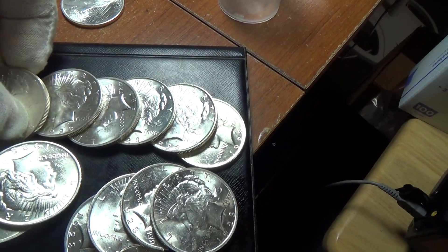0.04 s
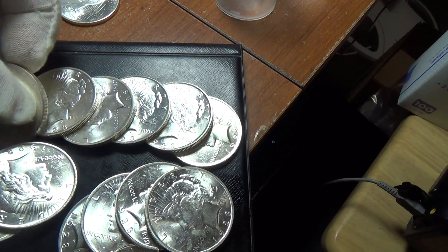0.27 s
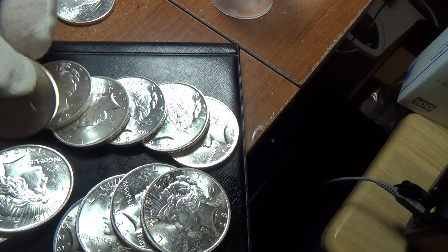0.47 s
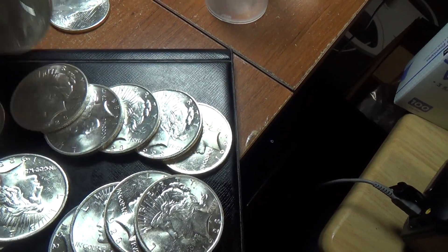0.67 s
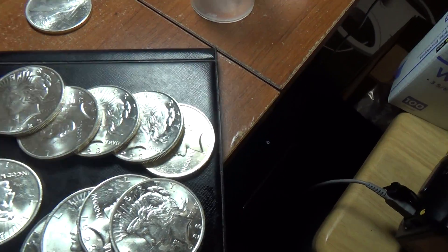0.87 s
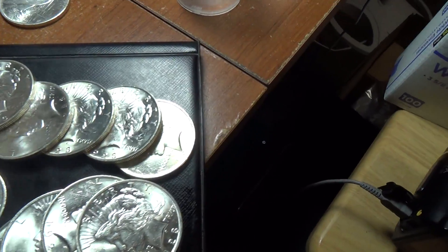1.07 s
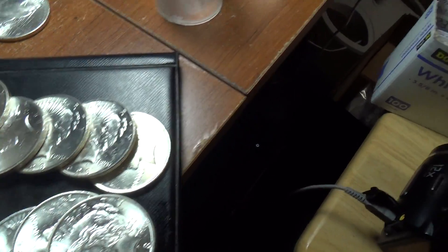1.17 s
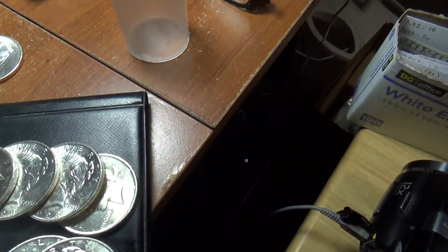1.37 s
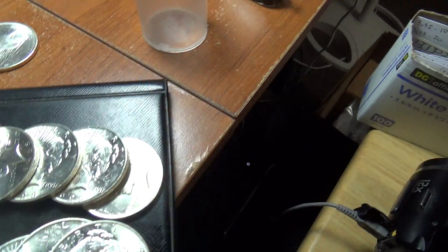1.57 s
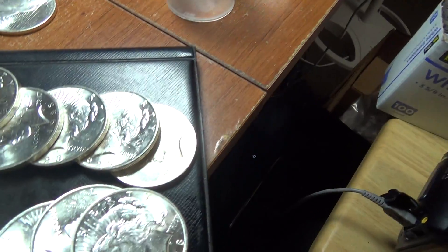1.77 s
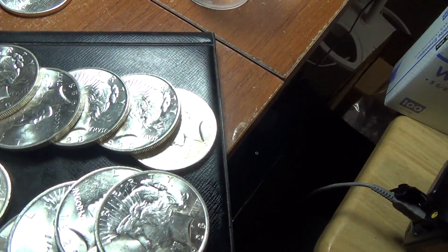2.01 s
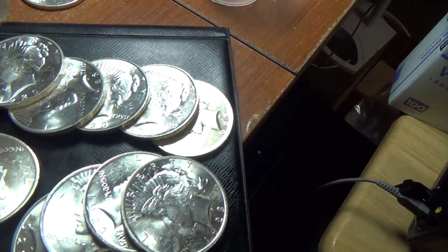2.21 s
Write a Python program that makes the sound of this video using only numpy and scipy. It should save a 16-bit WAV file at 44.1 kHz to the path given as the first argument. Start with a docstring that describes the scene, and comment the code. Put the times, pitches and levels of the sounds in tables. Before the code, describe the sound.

Large silver coins clink as one is slid over the others on a padded tray, with light scrapes and dull knocks. Released, it rattles, rings and settles. Heard close by in a small room with a faint fan-like hum.

```python
"""Large silver coins clink on a padded tray on a desk, heard from close by in a small room.
Fingers slide one coin over its neighbours: stick-slip friction scrapes, impacts excite the bending modes
of face and rim, and the damped tray answers with dull knocks. Let go, the coin rattles on the row, rings
and rocks to rest. A fan-like room noise goes on underneath."""
import sys
import numpy as np
from scipy import signal
from scipy.fft import rfft, irfft
from scipy.io import wavfile
from scipy.ndimage import uniform_filter1d

SR = 44100
rng = np.random.default_rng(int(sys.argv[2]) if len(sys.argv) > 2 else 0)


def output_pcm(signal):
    """Save a mono or channel-first signal as 16-bit PCM at the path in sys.argv[1].

    Samples are clipped to [-1, 1] before scaling.
    """
    pcm = np.clip(np.atleast_2d(signal).T, -1, 1) * 32767
    wavfile.write(sys.argv[1], SR, np.round(pcm).astype(np.int16))


N = 99225


def undb(db):
    """Amplitude ratio of a level in decibels."""
    return 10 ** (np.asarray(db) / 20)


def curve(points):
    """Linear interpolation of (time [s], value) points at every sample."""
    return np.interp(np.arange(N) / SR, *np.array(points).T)


def spectrum(points, size=N):
    """Interpolation of (frequency [Hz], level [dB]) points on a logarithmic frequency axis."""
    hz, db = np.array(points).T
    return np.interp(np.log(np.fft.rfftfreq(size, 1 / SR) + 1), np.log(hz), db)


def colour(x, points, tilt=0, size=2048):
    """Minimum-phase filtering at unit power gain; tilt adds treble slope in dB per octave."""
    octaves = np.log2(np.fft.rfftfreq(size, 1 / SR) / 1000 + .5)
    cepstrum = irfft(np.log(undb(spectrum(points, size) + tilt * octaves)))
    cepstrum[1:size // 2] *= 2  # folding makes the filter causal
    cepstrum[size // 2 + 1:] = 0
    response = irfft(np.exp(rfft(cepstrum)))
    return signal.fftconvolve(x, response / np.linalg.norm(response))[:len(x)]


def sides(db):
    """Amplitude panning: left and right gains, mean 1, for a level difference."""
    gains = undb(np.array([db, -db]) / 2)
    return gains / gains.mean(axis=0)


def add(out, at_s, x):
    """Superposition of a sound from a given time on."""
    start = max(int(at_s * SR), 0)
    out[start:start + len(x)] += x[:N - start]


def contact(points, tilt, rise_s, fall_s, size=4096):
    """Impact noise: a cluster of tiny collisions swells and dies away."""
    t = np.arange(size) / SR
    envelope = (1 - np.exp(-t / rise_s)) * np.exp(-t / fall_s)
    envelope /= envelope.max()
    burst = colour(rng.standard_normal(size) * envelope, points, tilt)
    return burst * np.linalg.norm(envelope) / np.linalg.norm(burst)


def ring(modes, t60_scale=1, detune=0.0014, rise_s=0.00075, size=22050):
    """Free vibration: a sum of damped modes, a little detuned by each contact."""
    t = np.arange(size) / SR
    hz, db, t60 = np.array(modes).T[:, :, None]
    hz = hz * (1 + detune * rng.standard_normal(hz.shape))
    waves = np.sin(2 * np.pi * (hz * t + rng.random(hz.shape)))
    decay = np.exp(-np.log(1000) * t / (t60 * t60_scale))
    gains = undb(db) * np.sqrt(2 / np.sum(undb(db) ** 2))
    return (gains * waves * decay).sum(axis=0) * (1 - np.exp(-t / rise_s))


# Spectra of the room's hum and hiss (frequency [Hz], relative level [dB])
HUM_SPECTRUM = [(25, -42), (120, -4), (146, -16.5), (172, -5), (201, -9), (245, -0.5), (281, -16.5),
                (328, -7.5), (459, -12.5), (625, -0.5), (850, -9), (1200, -47.5)]
HISS_SPECTRUM = [(500, -31.5), (850, -4), (1400, -3), (3070, -15), (11200, -22.5), (15800, -25.5)]
# Balance of the noise (frequency [Hz], left minus right [dB])
NOISE_BALANCE = [(30, -11), (110, -16.5), (700, -5), (4400, 0)]
# Its antiphase part (frequency [Hz], side minus mid [dB])
NOISE_SIDE = [(35, 10.5), (140, -25.5), (8000, -14)]
def room_noise(hum_db=-56.5, hiss_db=-59.5):
    """Incoherent addition: steady fan-like hum and hiss sum in power; the bass lies to the right."""
    hum, hiss = undb(spectrum(HUM_SPECTRUM)), undb(spectrum(HISS_SPECTRUM))
    hum *= undb(hum_db) / np.sqrt(np.mean(hum ** 2))
    hiss *= undb(hiss_db) / np.sqrt(np.mean(hiss ** 2))
    mid, side = rfft(rng.standard_normal((2, N))) * np.hypot(hum, hiss)
    antiphase = side * undb(spectrum(NOISE_SIDE)) * np.array([[1], [-1]])
    return irfft(mid * sides(spectrum(NOISE_BALANCE)) + antiphase, N)


def reflections(x, t60_s, delay_s, size=22050):
    """Reverberation: dense echoes decay exponentially, at unit power gain."""
    t = np.arange(size) / SR
    response = rng.standard_normal(size) * np.exp(-np.log(1000) * t / t60_s) * (t > delay_s)
    return signal.fftconvolve(x, response / np.linalg.norm(response))[:N]


# Spectrum of the padded tray (frequency [Hz], relative level [dB])
TRAY_SPECTRUM = [(40, -42.5), (350, -20), (700, 1.5), (1050, 1), (2000, -8.5), (3000, -20), (4300, -14.5),
                 (15000, -48.5)]
# A coin bumps the tray (time [s], level [dB], tilt [dB/octave], thud frequency [Hz])
TRAY_KNOCKS = [(0.018, -39, 10.5, 1740), (.061, -33.5, 7.5, 1570), (0.2391, -20.5, 8, 1020),
               (.2738, -32, 6, 1800), (0.4347, -20.5, 2, 620), (.468, -26, -6.5, 1170),
               (0.4969, -31, -0.5, 920), (0.6465, -14.5, -2, 1000), (.7003, -24.5, 0.5, 680)]
def tray_knocks(thud_db=2, thud_t60_s=0.0126, cutoff_hz=267):
    """Heavy damping: the tray gives a dead knock and a thud whose pitch depends on where the coin lands."""
    out = np.zeros(N)
    for at, db, tilt, hz in TRAY_KNOCKS:
        add(out, at, undb(db) * contact(TRAY_SPECTRUM, tilt, rise_s=0.00017, fall_s=0.0015))
        add(out, at, undb(db + thud_db) * ring([(hz, 0, thud_t60_s)]))
    # the knocks carry little bass
    return signal.sosfilt(signal.butter(2, cutoff_hz, "high", fs=SR, output="sos"), out)


# Modes of a coin lying in the row (frequency [Hz], relative level [dB], unscaled T60 [s])
NEIGHBOUR_MODES = [(4800, 0.5, 0.08), (5000, -5, 0.09), (5170, -5.5, 0.063)]
# Light pushes on that coin (time [s], level [dB])
NUDGES = [(.533, -31), (.751, -34.5), (.881, -47.5)]
def nudges():
    """Impulse excitation: a nudged neighbour answers with a short, lower chime."""
    out = np.zeros(N)
    for at, db in NUDGES:
        add(out, at, undb(db) * ring(NEIGHBOUR_MODES, t60_scale=0.75))
    return out


# Modes of a coin: the face's dome modes together with two low rim modes that sound along with them, then the
# high rim modes (frequency [Hz], relative level [dB], unscaled T60 [s])
MAIN_MODES = [(4360, -13.5, 0.12), (4460, -12, 0.058), (7704, -1, 0.24), (7780, 0, 0.11), (7560, -4, 0.025),
              (7820, -0.5, 0.048), (8200, -6, 0.05)]
RIM_MODES = [(9970, 6, 0.3), (10050, -1, .2), (10260, -0.5, 0.07)]
def coin_ring(face_db, rim_db, t60_scale=1):
    """Plate vibration: the face flexes like a dome and waves run round the rim; the two low rim modes sound
    along with the dome."""
    return undb(face_db) * ring(MAIN_MODES, t60_scale) + undb(rim_db) * ring(RIM_MODES, t60_scale)


def slips(per_s, fall_s=0.0028, scatter_db=3, size=1024):
    """Stick-slip friction: relief catches on relief, and each uneven slip is a noise burst; rms 1."""
    count = N // 20
    onsets = np.cumsum(rng.gamma(4, 1 / 4, count)) * SR / per_s
    strength = undb(scatter_db * np.clip(rng.standard_normal(count), -2, 2))
    impulses = np.bincount(onsets[onsets < N].astype(int), strength[onsets < N], N)
    envelope = signal.fftconvolve(impulses, np.exp(-np.arange(size) / SR / fall_s))[:N]
    force = envelope * rng.standard_normal(N)
    return force / force.std()


def rubbing(levels, points, slips_per_s, ring_db):
    """Forced vibration: while the coin moves, slips make noise and drive the two lowest rim modes."""
    t = np.arange(N) / SR
    moving = (t >= levels[0][0]) & (t <= levels[-1][0])
    force = slips(slips_per_s) * undb(curve(levels)) * moving
    face = ring(MAIN_MODES[:2], t60_scale=0.26)
    ringing = signal.fftconvolve(force, face / np.linalg.norm(face))[:N]
    return colour(force, points) + undb(ring_db) * ringing


# Envelope of the slide (time [s], level [dB])
SLIDE_LEVELS = [(0, -40), (.045, -49), (.09, -76), (.145, -62.5), (.2, -46.5), (.225, -38.5), (.32, -41),
                (.332, -48.5), (.39, -42.5), (.42, -32), (.5, -37), (.545, -40), (.595, -49), (.615, -72)]
# Spectrum of the scrape (frequency [Hz], relative level [dB])
SCRAPE_SPECTRUM = [(40, -42), (440, -5), (700, 3.5), (1900, 4.5), (3400, -5.5), (4450, -5.5), (6400, 2),
                   (7900, 7), (8900, -15), (10300, -5.5), (15500, -29.5)]
def sliding():
    """Sliding friction: the coin scrapes over its neighbours under the fingers."""
    return rubbing(SLIDE_LEVELS, SCRAPE_SPECTRUM, slips_per_s=170, ring_db=-10)


# Envelope of the rattle (time [s], level [dB])
RATTLE_LEVELS = [(.652, -25.5), (.69, -23), (.724, -28.5), (.733, -32.5), (.775, -58)]
# Spectrum of the chatter (frequency [Hz], relative level [dB])
CHATTER_SPECTRUM = [(40, -49.5), (230, -2), (470, -4), (680, 8), (1900, -5), (3600, -16), (4400, 3),
                    (5600, -4.5), (8200, 6.5), (9200, 2.5), (13000, 0), (15500, -13.5)]
def rattling():
    """Intermittent contact: the freed coin chatters on the row."""
    return rubbing(RATTLE_LEVELS, CHATTER_SPECTRUM, slips_per_s=300, ring_db=-13)


# Taps of the settling rim (time [s], level [dB])
RIM_TAPS = [(0.7825, -33.5), (0.818, -41), (.848, -39), (0.88, -46), (0.912, -46.5), (0.967, -51)]
# Spectrum of a tap (frequency [Hz], relative level [dB])
TAP_SPECTRUM = [(80, -37), (700, -2), (2100, -3.5), (3700, -17.5), (4950, 3), (5600, -4.5), (7300, -6.5),
                (8500, 4.5), (9000, -17), (10800, -4), (15500, -31)]
def rocking(face_db=-15.5, rim_db=-18.5):
    """Damped rocking: fading rim taps keep the coin ringing as it settles."""
    out = np.zeros(N)
    for at, db in RIM_TAPS:
        tilt = 0.14 * (db - RIM_TAPS[0][1])  # softer taps are duller
        add(out, at, undb(db) * contact(TAP_SPECTRUM, tilt, rise_s=0.00072, fall_s=0.0054))
        add(out, at, coin_ring(db + face_db, db + rim_db))
    return out


# Coin strikes coin (time [s], click level [dB], face level [dB], rim level [dB], T60 scale [ratio])
COIN_STRIKES = [(.001, -33, -52, -32, 0.35), (0.067, -31, -55, -54, 0.21), (0.187, -37.5, -48, -61, .2),
                (0.211, -36, -29, -62, 0.25), (0.2204, -32, -30, -58, 0.4),
                (0.2399, -21.5, -18, -33.5, 0.33), (0.274, -38, -38, -48, 0.14),
                (0.288, -32, -40, -54, 0.34), (.305, -54, -23, -55, .13), (0.3676, -30, -25, -58, 0.2),
                (0.3913, -40, -25, -52, 0.14), (0.4399, -23.5, -14.5, -33, 0.454),
                (0.468, -22, -19.5, -34.5, 0.63), (0.49, -25.5, -15.5, -35, 0.3),
                (.524, -27, -23.5, -40.5, 0.8), (.584, -54, -34.5, -61.5, 1.0),
                (0.649, -24, -13.5, -26.5, 0.93), (.666, -28.5, -27, -18.5, 0.38),
                (0.682, -23.5, -12.5, -26.5, 0.4), (.691, -34.5, -27.5, -19, 0.67),
                (0.707, -21, -29.5, -36.5, 0.47), (0.721, -25, -29.5, -36.5, 0.9)]
# Spectrum of the click (frequency [Hz], relative level [dB])
CLICK_SPECTRUM = [(100, -32.5), (900, -7.5), (2000, -3.5), (3400, -17), (4400, -4), (8100, 5), (9000, -14),
                  (10300, -1), (15500, -28)]
def clinks():
    """Impact excitation: each strike clicks and sets face and rim ringing; fingers damp the modes."""
    out = np.zeros(N)
    for at, click_db, face_db, rim_db, t60_scale in COIN_STRIKES:
        add(out, at, undb(click_db) * contact(CLICK_SPECTRUM, 0, rise_s=0.0015, fall_s=0.0043))
        add(out, at, coin_ring(face_db, rim_db, t60_scale))
    return out


# Direction along the coin's path (time [s], left minus right [dB])
PATH_BALANCE = [(.21, 5), (.49, 7.5), (.64, 3.5)]
# Further balance of coins and echoes (frequency [Hz], left minus right [dB])
BODY_BALANCE = [(50, -4), (180, -22), (800, -3), (2400, -1), (8000, 0.5), (10500, -2.5)]
def scene():
    """Superposition: coins left of centre with their bass to the right, echoes and room noise."""
    coins = clinks() + nudges() + rocking() + tray_knocks() + sliding() + rattling()
    desk = undb(-21.5) * reflections(coins, t60_s=0.07, delay_s=0.00013)
    walls = undb(-12.5) * reflections(coins, t60_s=0.13, delay_s=0.0026)
    stereo = coins * sides(curve(PATH_BALANCE)) + np.array([desk, -desk]) + walls
    balanced = irfft(rfft(stereo, 2 * N) * sides(spectrum(BODY_BALANCE, 2 * N)))[:, :N]
    return balanced + room_noise()


def record(dry):
    """Limiting and band limiting: the loudest rings are held down and a steep low-pass cuts the top."""
    limit_db, window_s, cutoff_hz = -14, 0.003, 15900
    power = uniform_filter1d(np.mean(dry ** 2, axis=0), int(window_s * SR))
    held = dry / (1 + (power / undb(limit_db) ** 2) ** 2) ** (1 / 4)
    return signal.sosfilt(signal.ellip(10, .2, 80, cutoff_hz, fs=SR, output="sos"), held)


dry = scene()
out = record(dry)
output_pcm(out)
```